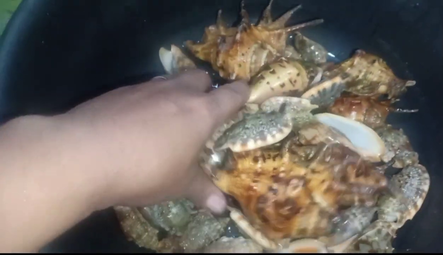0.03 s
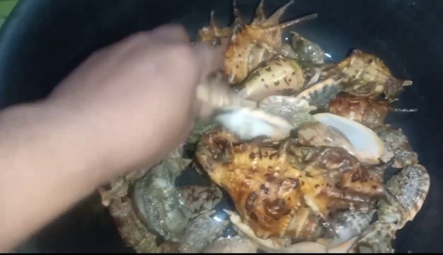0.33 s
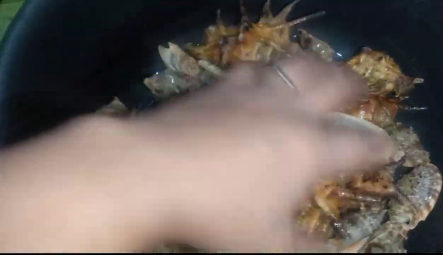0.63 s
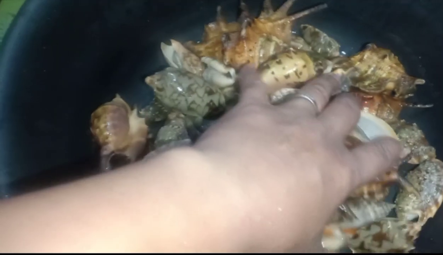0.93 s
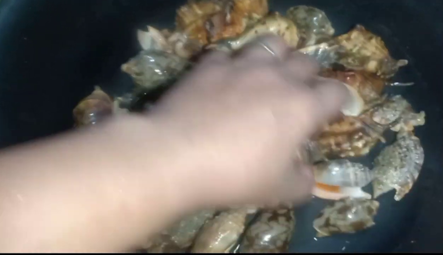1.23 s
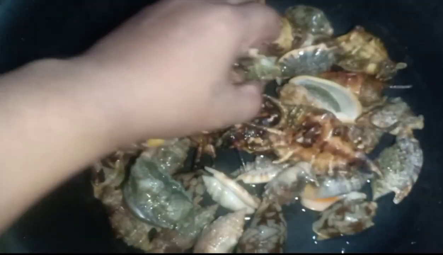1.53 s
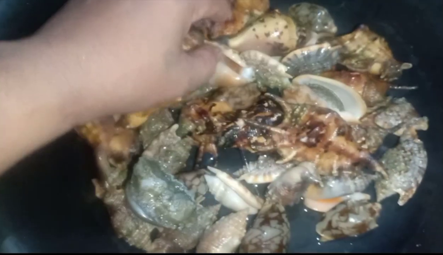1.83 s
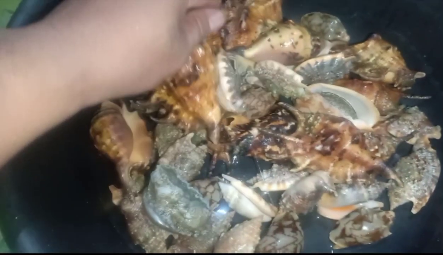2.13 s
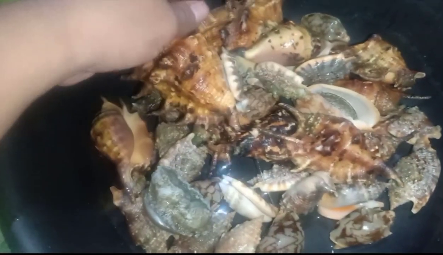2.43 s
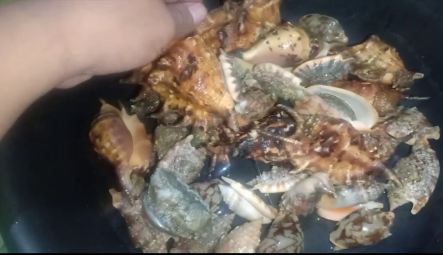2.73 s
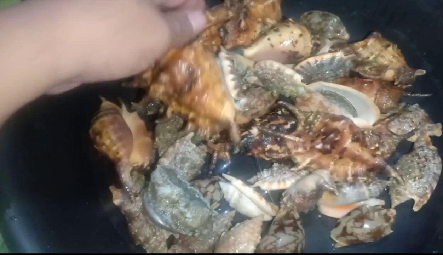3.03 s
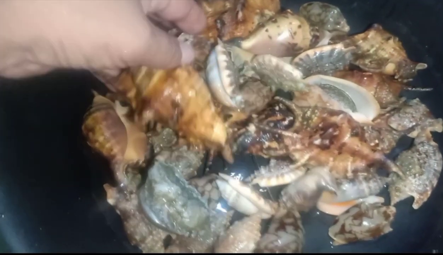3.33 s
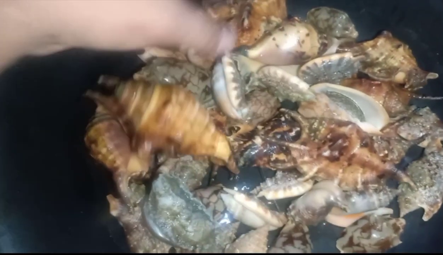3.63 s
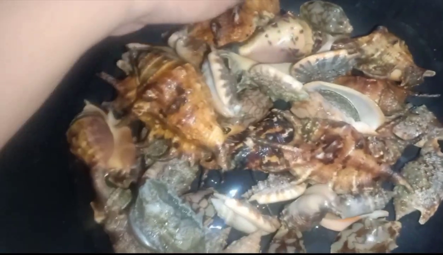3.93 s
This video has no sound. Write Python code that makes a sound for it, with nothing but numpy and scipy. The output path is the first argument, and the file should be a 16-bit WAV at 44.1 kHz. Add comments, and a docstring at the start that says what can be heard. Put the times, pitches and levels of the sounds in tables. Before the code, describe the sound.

Hard seashells clatter and scrape close by as a hand stirs them in a plastic basin, with dull thuds around 0.8 and 1.1 seconds. The dense, bright clacking thins after 2 seconds and pauses near 2.4. Light taps and scrapes return from 2.9, then a loud clack and thud land at 3.8 and smaller knocks at 3.9. A faint low hum and distant motor lie underneath in the small room.

```python
"""Rummaging through seashells

A hand stirs large seashells heaped in a plastic basin, close by in a small room. Each knock is a brief,
chattering touch: the shell's wall clacks, its lip pings, its hollow rings at its own pitch near 2 kHz,
and the basin thuds. Between knocks the shells scrape and rattle. A low hum and a far motor lie below."""
import sys
import numpy as np
from scipy import signal
from scipy.fft import rfft, irfft
from scipy.io import wavfile
from scipy.ndimage import uniform_filter1d, minimum_filter1d

SR = 44100
rng = np.random.default_rng(int(sys.argv[2]) if len(sys.argv) > 2 else 0)


def unload_audio(sound):
    """Save the sound as a 16-bit wav file, at the path given as the first command line argument."""
    columns = np.transpose(np.atleast_2d(sound))
    # keep every value between -1 and 1, then stretch to whole-number steps
    steps = np.round(np.clip(columns, -1, 1) * 32767)
    wavfile.write(sys.argv[1], SR, steps.astype(np.int16))


N = 176400
TOP_HZ = 16000
SHELL_T60_S, CRACK_T60_S, PING_T60_S = .014, .018, .0099  # a T60 is the time to fade by 60 dB


def undb(db):
    """Turn decibels into a gain."""
    return 10 ** (np.asarray(db) / 20)


def unit(x):
    """Scale each channel to energy 1."""
    return x / np.sqrt(np.sum(x ** 2, axis=-1, keepdims=True))


def strength(db):
    """The gain that gives a sound of energy 1 this level over 10 ms."""
    return undb(db) * np.sqrt(SR / 100)


def gains(curve, size):
    """Turn a curve of (Hz, dB) points into a gain for each frequency."""
    hz, db = np.array(curve, float).T
    return undb(np.interp(np.log(np.fft.rfftfreq(size, 1 / SR) + 1), np.log(hz), db))


def through(x, response):
    """Pass a sound through a response (convolve), keeping its length."""
    return signal.fftconvolve(np.atleast_2d(x), np.atleast_2d(response), axes=-1)[:, :x.shape[-1]]


def colour(x, curve, size=1024):
    """Shape a sound's tone with a filter that never rings ahead of the sound."""
    cepstrum = irfft(np.log(gains(curve, size)))
    cepstrum[1:size // 2] *= 2
    cepstrum[size // 2 + 1:] = 0
    return through(x, irfft(np.exp(rfft(cepstrum)))[:size // 2])


def fade(t60, size, build_s=.0008):
    """Ringing builds up quickly, then dies away."""
    t = np.arange(size) / SR
    return (1 - np.exp(-t / build_s)) * np.exp(-np.log(1000) * t / t60)


def burst(t60, channels=2, size=3000):
    """Dying noise, like many close tones ringing at once."""
    return unit(rng.standard_normal((channels, size)) * fade(t60, size))


def tones(hz, t60, size=3000):
    """Ringing tones that reach each side with their own strength and phase."""
    weight, phase = rng.uniform(0, 1, (2, 2, len(hz), 1))
    waves = np.sin(2 * np.pi * (np.outer(hz, np.arange(size)) / SR + phase))
    return unit(np.sum(weight * waves, axis=1) * fade(t60, size))


def add(out, start, x):
    """Mix a sound in, unless it starts outside the scene."""
    i = int(start * SR)
    if 0 <= i < N:
        out[:, i:i + x.shape[1]] += x[:, :N - i]


def air(level_db=-54):
    """A low rumble, mostly shared by both sides, and a faint hiss that is not."""
    # The tone of the noise. Each row: frequency in Hz, relative level in dB.
    tone = [(50, -29), (115, 3.5), (290, -3.5), (500, -8), (3900, -24.5), (5300, -19), (9000, -31.5)]
    noise = rfft(rng.standard_normal((3, N)))
    apart = gains([(200, -15.5), (1500, 20)], N)
    stereo = (noise[0] + apart * noise[1:]) / np.hypot(1, apart)
    return undb(level_db) * np.sqrt(N) * unit(irfft(stereo * gains(tone, N), N))


def hum(pitch_hz=128.4, level_db=-56.5):
    """A low, wavering hum: a very narrow band of noise."""
    hz = np.fft.rfftfreq(N, 1 / SR)
    band = rfft(rng.standard_normal(N)) / (1 + ((hz - pitch_hz) / 10) ** 2)
    return undb(level_db) * np.sqrt(N) * unit(irfft(band, N))


def motor(resonance_hz=280, width_hz=45, count=9):
    """A distant motor speeds up and slows; its odd harmonics glide through one low resonance."""
    # The motor's run. Each row: time in seconds, cycles per second, level at the resonance in dB.
    run = [(2.299, 21, -54.5), (2.7, 24.2, -56.5), (3.2, 21.5, -49), (3.7, 22, -51)]
    times, rates, levels = np.array(run).T
    t = np.arange(N) / SR
    rate, db = np.interp(t, times, rates), np.interp(t, times, levels)
    harmonics = 2 * np.arange(count)[:, None] + 1
    weight = 1 / np.hypot(1, (harmonics * rate - resonance_hz) / width_hz)
    cycles = harmonics * np.cumsum(rate) / SR + rng.uniform(0, 1, (count, 1))
    return undb(db) * np.sum(weight * np.sin(2 * np.pi * cycles), axis=0)


def contact(mean_delay_s=.002, chatter=.38, count=12, size=3000):
    """A first touch, then ridges chattering over each other for a few milliseconds."""
    push = np.zeros(size)
    push[0] = 1
    bumps = (rng.gamma(2, mean_delay_s / 2, count) * SR).astype(int)
    push[np.minimum(bumps, size - 1)] += chatter * rng.standard_normal(count)
    return push


def wall_clack(hz):
    """The shell's wall rings with one main tone, a cluster of others and a noisy crack."""
    # The tone of the clack. Each row: frequency in Hz, gain in dB.
    tone = [(1300, -42), (2250, 0.5), (2800, -2.5), (4200, -13), (5500, -26.5)]
    cluster = tones(rng.uniform(2106, 4292, 8), SHELL_T60_S) + undb(-5.5) * burst(CRACK_T60_S)
    return unit(colour(cluster, tone)) + undb(-4) * tones([hz], SHELL_T60_S)


def lip_ping(hz, clack_db):
    """The shell's lip gives a bright crack and two close tones; weaker knocks sound duller."""
    # The tone of the ping. Each row: frequency in Hz, gain in dB.
    tone = [(3500, -15), (4900, 9), (7000, -5), (8800, -15), (9800, -29.5), (14200, -13.5), (16000, -36.5)]
    pair_hz = hz * np.exp(.039 * rng.standard_normal(2))
    ping = tones(pair_hz, PING_T60_S) + undb(11) * burst(CRACK_T60_S)
    cutoff_hz = min(9900 * 2 ** (np.clip(clack_db + 28, -20, 10) / 20), TOP_HZ)
    return colour(signal.lfilter(*signal.butter(2, cutoff_hz, fs=SR), ping), tone)


def hollow_ring(hz, band_hz=(1480, 2245)):
    """The shell's hollow rings at its own pitch, with weaker tones around it."""
    ring = tones([hz], t60=.028) + undb(-7.5) * tones(rng.uniform(*band_hz, 8), SHELL_T60_S)
    return signal.lfilter(*signal.butter(2, band_hz, "bandpass", fs=SR), ring)


def basin_thud(t60=.03, low_cut_hz=151):
    """The plastic basin answers with a dull thud that dies quickly."""
    # The tone of the basin. Each row: frequency in Hz, gain in dB.
    tone = [(190, -6), (450, 5), (1400, 5.5), (2000, -42)]
    ring = colour(burst(t60, channels=1) + .83 * burst(t60), tone)
    return unit(signal.lfilter(*signal.butter(4, low_cut_hz, "highpass", fs=SR), ring))


def shell_pitches(t):
    """The three pitches of the shell that the hand is moving at time t."""
    # The shells in turn. Each row: start in seconds, then hollow, wall and lip pitch in Hz.
    shells = [(0, 2195, 2700, 4746), (.305, 2065, 2614, 5100), (.78, 2157, 4100, 5525),
              (1.11, 1956, 2655, 4780), (1.21, 1840, 3409, 5247), (1.6, 2010, 3214, 5400),
              (1.8, 1805, 2890, 5410), (2.05, 1717, 2835, 5600), (3.05, 1814, 2385, 5171)]
    rows = np.array(shells)
    return rows[np.searchsorted(rows[1:, 0], t), 1:]


def knock(pitches, clack_db, hollow_db, ping_db, basin_db):
    """One contact shakes a shell's wall, lip and hollow, and the basin under it."""
    hollow_hz, wall_hz, lip_hz = pitches
    push = contact()
    lean_left_db = np.array([[2], [-2]])
    parts = [(wall_clack(wall_hz), clack_db), (lip_ping(lip_hz, clack_db), ping_db),
             (hollow_ring(hollow_hz), hollow_db + lean_left_db), (basin_thud(), basin_db)]
    return sum(strength(db) * unit(through(part, push)) for part, db in parts)


def scrapes(knocks_per_s=260, scatter_db=6):
    """A shell dragged over the heap sets off a swarm of tiny knocks on its neighbours."""
    # Each row: start in seconds, length in seconds, clack level in dB, basin in dB above the clack.
    drags = [(-.05, 0.18, -33, 0), (.15, .15, -37, -4), (0.341, 0.063, -35.5, -4), (0.419, .19, -40.5, 0),
             (0.717, 0.13, -34.5, -1), (0.849, .17, -31.5, 0.5), (1.061, .12, -29, 0),
             (1.214, .14, -41, -10), (1.34, 0.14, -34, -1.5), (1.617, 0.13, -33.5, -9.5),
             (1.807, 0.15, -54.5, 5.5), (1.985, 0.19, -39, -4.5), (3.084, 0.06, -37.5, 2),
             (3.239, 0.2, -49, -2.5)]
    out = np.zeros((2, N))
    for start, length, db, basin_db in drags:
        count = max(int(knocks_per_s * length), 2)
        progress = (np.arange(count) + rng.uniform(0, 1, count)) / count
        swell = np.sqrt(np.sin(np.pi * progress))
        shares = unit(undb(scatter_db * rng.uniform(-1.3, 1, count)) * swell)
        levels = db + 20 * np.log10(shares * np.sqrt(length * 100))  # together they average db
        for t, clack_db in zip(start + progress * length, levels):
            hollow_db, ping_db = clack_db + rng.normal((3.5, -5.5), 2.28)
            pitches = shell_pitches(t) * np.exp(.1 * rng.standard_normal(3))
            add(out, t, knock(pitches, clack_db, hollow_db, ping_db, clack_db + basin_db))
    return out


def knocks():
    """Shell hits shell in clear, separate knocks."""
    # Each row: start in seconds, then the levels of the clack, the hollow and the ping in dB.
    hits = [(.027, -25.5, -34.5, -21), (.054, -32, -36.5, -23), (.088, -25, -38.5, -28.5),
            (.226, -20, -20.5, -24.5), (0.24, -29, -23, -21), (.249, -30, -32.5, -21),
            (0.295, -38, -31, -15), (.309, -22, -26.5, -26.5), (.340, -19.5, -26, -20),
            (.349, -19, -23, -20.5), (0.425, -31.5, -26, -34.5), (.471, -31, -19.5, -24.5),
            (0.5, -26, -30, -27), (.711, -17.5, -24.5, -27.5), (.733, -20.5, -35.5, -29.5),
            (0.785, -27.5, -27.5, -19.5), (0.843, -15, -26.5, -22.5), (.884, -19.5, -21, -23.5),
            (.899, -23, -32.5, -14.5), (.932, -21, -27.5, -26), (.985, -16, -32.5, -19.5),
            (1.092, -25, -20, -25), (1.119, -21, -22.5, -24), (1.166, -24, -29.5, -23.5),
            (1.184, -16, -19, -18.5), (1.196, -24, -23.5, -18.5), (1.215, -20, -16.5, -17.5),
            (1.226, -19.5, -12, -15), (1.277, -35, -22.5, -41.5), (1.36, -23, -20.5, -26.5),
            (1.388, -24, -34.5, -23.5), (1.424, -13, -19.5, -19.5), (1.447, -17.5, -21.5, -25),
            (1.475, -20.5, -26.5, -22.5), (1.512, -24, -20, -24.5), (1.619, -21, -20, -31.5),
            (1.682, -20, -22.5, -26), (1.735, -33.5, -36.5, -28), (1.814, -27, -20, -28.5),
            (1.971, -22.5, -28, -32.5), (1.981, -19.5, -11, -24), (2.091, -26.5, -21, -29),
            (2.125, -31.5, -20, -26.5), (2.211, -38.5, -29, -52), (2.265, -30, -33, -32),
            (2.287, -37, -24.5, -39.5), (2.917, -35.5, -25.5, -31.5), (3.06, -39.5, -32, -49),
            (3.096, -31.5, -20.5, -32), (3.368, -34.5, -40.5, -37), (3.485, -42, -38, -44.5),
            (3.731, -59.5, -32, -59.5), (3.770, -13, -9, -15.5), (3.783, -22.5, -41, -22.5),
            (3.919, -23.5, -24, -32.5), (3.938, -24, -30.5, -22.5)]
    out = np.zeros((2, N))
    for start, clack_db, hollow_db, ping_db in hits:
        basin_db = max(clack_db, hollow_db) - 14.5
        add(out, start, knock(shell_pitches(start), clack_db, hollow_db, ping_db, basin_db))
    return out


def heavy_drops():
    """Heavy shells drop on the basin and make it thud."""
    # Each row: start in seconds, level in dB.
    drops = [(0.788, -26.5), (.844, -26), (1.068, -24), (3.774, -24), (3.92, -24.5)]
    out = np.zeros((2, N))
    for start, db in drops:
        add(out, start, strength(db) * basin_thud())
    return out


def spine_ticks(band_hz=(5950, 9100)):
    """A shell's spines snap past an edge with a glassy tick."""
    # Each row: start in seconds, level in dB.
    snaps = [(.926, -34), (.934, -29.5), (1.092, -31.5), (1.423, -34), (1.682, -35)]
    out = np.zeros((2, N))
    for start, db in snaps:
        tick = signal.lfilter(*signal.butter(2, band_hz, "bandpass", fs=SR), burst(PING_T60_S))
        add(out, start, strength(db) * unit(tick))
    return out


def room(x, delay_s=.0072):
    """Add quick echoes from inside the basin and the room's longer tail."""
    echo = undb(-12.5) * burst(t60=.064, size=SR) + undb(-13.5) * burst(t60=.52, size=SR)
    return x + through(x, np.pad(echo, ((0, 0), (int(delay_s * SR), 0))))


def scene():
    """The shells in the room, over the quiet background."""
    shells = knocks() + heavy_drops() + spine_ticks() + scrapes()
    return room(shells) + air() + hum() + motor()


def record(dry, ceiling=.85, limiter_s=.004):
    """Each microphone has its own tone; a limiter holds the hardest knocks; the top treble is cut."""
    # The balance of the two microphones. Each row: frequency in Hz, left minus right in dB.
    balance = [(500, -2), (2400, 4.5), (3300, -3), (4200, -6.5), (4900, -18), (5800, 5), (9000, -0.5)]
    ratio = gains(balance, N)
    sides = np.array([ratio, np.ones_like(ratio)]) * np.sqrt(2 / (1 + ratio ** 2))
    heard = irfft(rfft(dry) * sides, N)
    span = int(limiter_s * SR)
    allowed_gain = ceiling / np.maximum(np.abs(heard).max(axis=0), ceiling)
    limited = heard * uniform_filter1d(minimum_filter1d(allowed_gain, span), span)
    return signal.sosfilt(signal.ellip(8, .2, 70, TOP_HZ, fs=SR, output="sos"), limited)


dry = scene()
out = record(dry)
unload_audio(out)
```